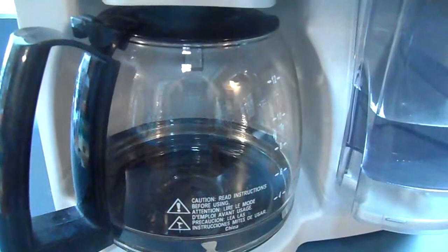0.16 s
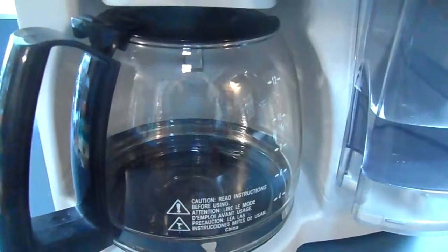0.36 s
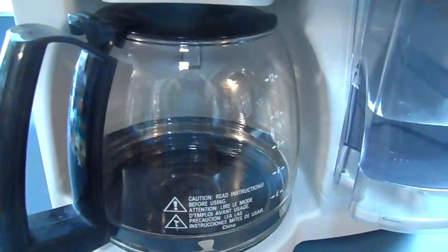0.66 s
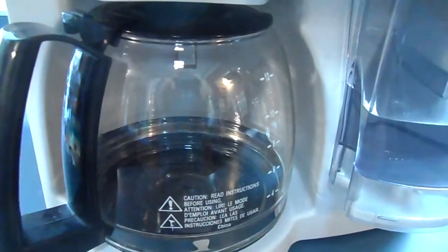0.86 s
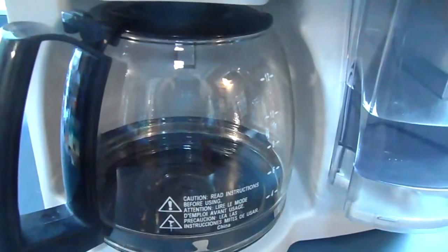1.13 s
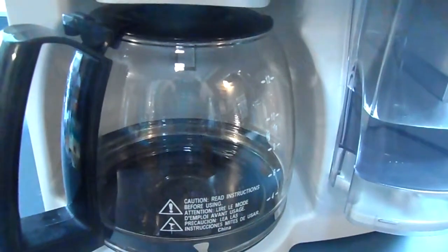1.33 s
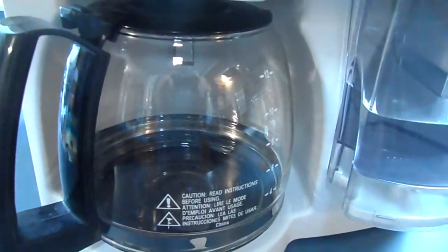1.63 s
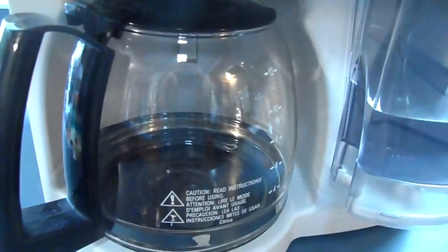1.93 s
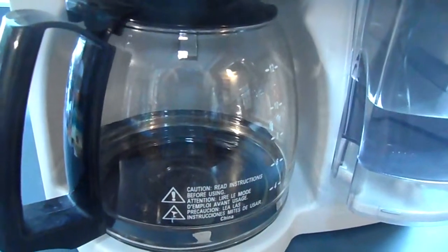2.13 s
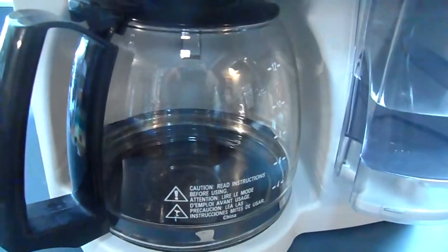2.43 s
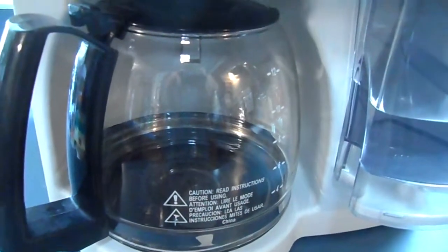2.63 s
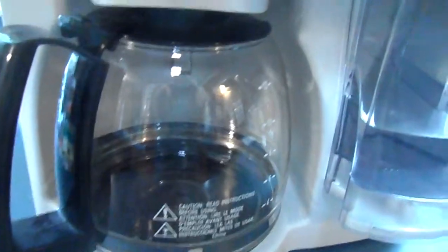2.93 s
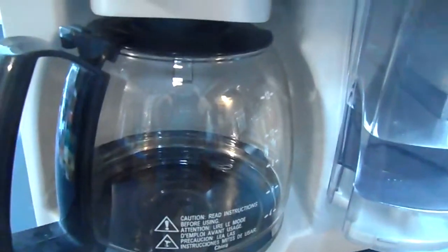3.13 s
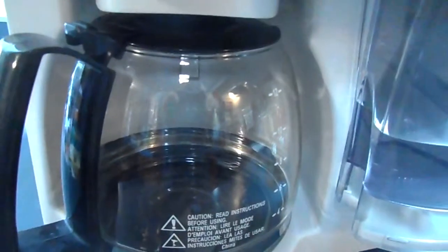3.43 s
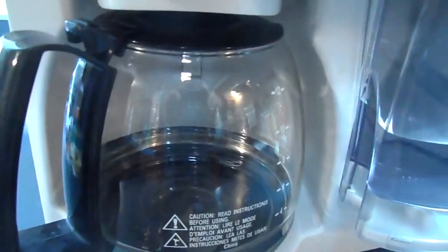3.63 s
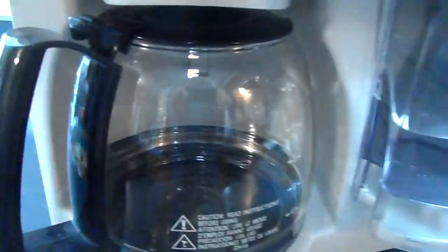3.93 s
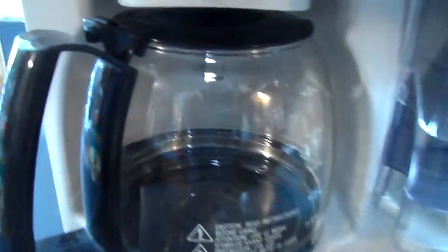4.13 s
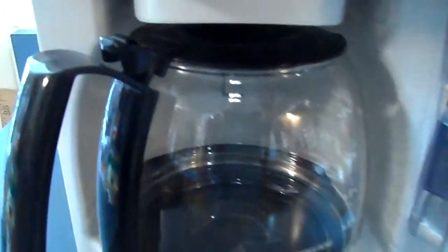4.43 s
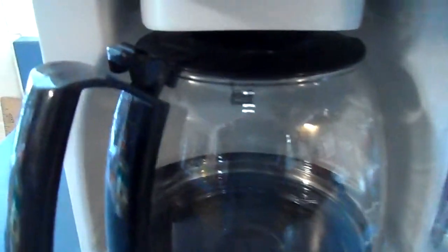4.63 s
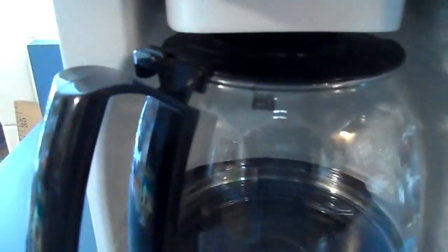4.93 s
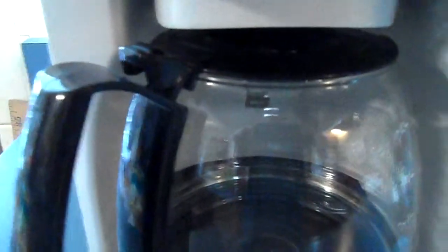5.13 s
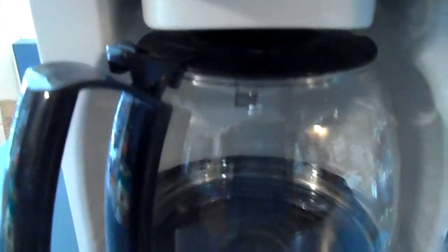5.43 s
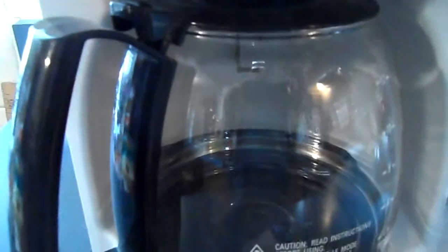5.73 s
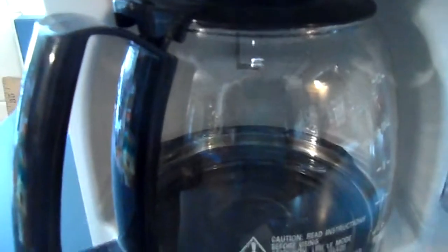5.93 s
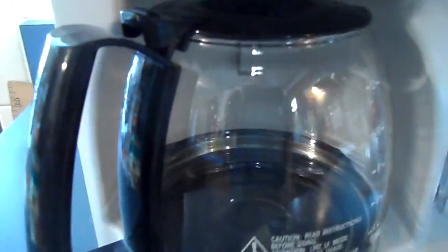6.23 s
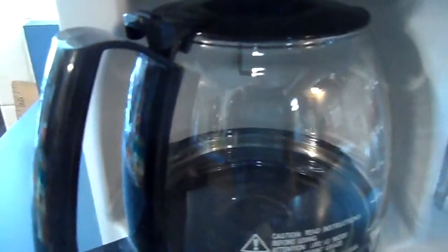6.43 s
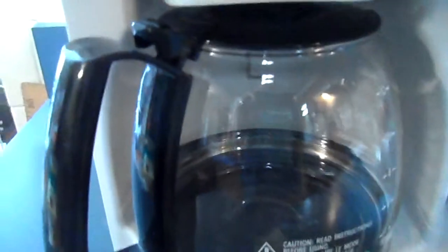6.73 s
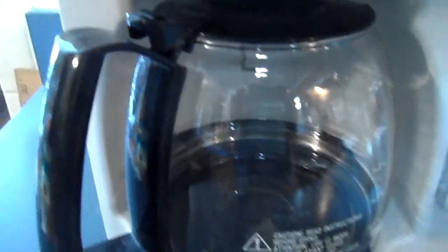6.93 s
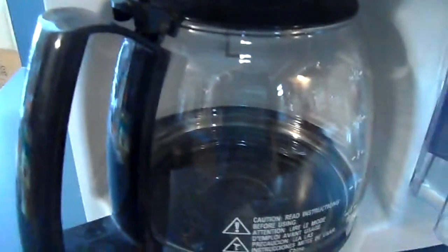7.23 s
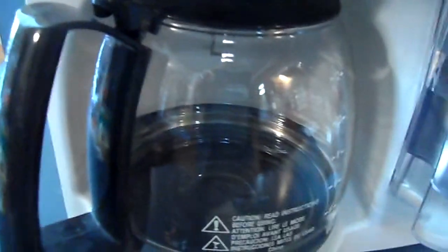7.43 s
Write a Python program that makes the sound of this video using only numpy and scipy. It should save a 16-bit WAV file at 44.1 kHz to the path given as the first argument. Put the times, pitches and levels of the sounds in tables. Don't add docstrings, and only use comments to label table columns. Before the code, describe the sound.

Close coffee machine heating water: quiet seething and scattered spits, then brief rumbling surges of boiling knocks around three, five and six seconds.

```python
import sys
import numpy as np
from scipy import signal
from scipy.fft import rfft, irfft
from scipy.io import wavfile
from scipy.ndimage import uniform_filter1d, map_coordinates

SR = 44100
rng = np.random.default_rng(int(sys.argv[2]) if len(sys.argv) > 2 else 0)


def attenuation_scalar(level_db):
    decades = np.asarray(level_db, float) / 20
    return 10 ** decades


def log_audio(samples):
    frames = np.atleast_2d(samples).T
    limited = np.clip(frames, -1, 1)
    pcm = np.round(limited * 32767).astype(np.int16)
    wavfile.write(sys.argv[1], SR, pcm)


N = 334278
TOP_HZ = 14250

# f/Hz, width/Hz, level/dB
TUBE_MODES = [(238.2, 14, -1.5), (344.7, 18.5, -1), (427.3, 30, -1), (492, 59, -2), (589, 63, -3.5),
              (938.6, 50, -3)]
# f/Hz, width/Hz, level/dB
SHELL_MODES = [(1878, 470, 17.5), (2320, 540, 9), (3000, 550, 12.5), (3690, 400, -5), (4330, 70, 1)]


def level(x, db):
    return x * attenuation_scalar(db) / np.sqrt(np.mean(x ** 2))


def ring(x, hz, width):
    centre, q = min(hz, .4 * SR), max(hz / width, .5)
    return signal.lfilter(*signal.iirpeak(centre, q, SR), x)


def steep(x, hz, width):
    return ring(ring(x, hz, width), hz, 2 * width)


def resonate(x, modes, widen=1):
    return sum(attenuation_scalar(db) * steep(x, hz, widen * width) for hz, width, db in modes)


def coloured(points):
    hz, db = np.transpose(points)
    f = np.fft.rfftfreq(N, 1 / SR) + 1
    shape = attenuation_scalar(np.interp(np.log(f), np.log(hz), db)) * (f < TOP_HZ)
    return level(irfft(rfft(rng.standard_normal(N)) * shape, N), 0)


def walk(rate):
    k = int(SR / rate)
    steps = np.repeat(rng.standard_normal(N // k + 1), k)
    return 2.47 * uniform_filter1d(uniform_filter1d(steps, k), k)[:N]


def burst(noise, ms, rise):
    u = np.arange(len(noise)) / SR / (max(ms, .3) / 1000)
    return noise * (1 - np.exp(-u / rise)) * np.exp(-u)


def add(out, s, sound, db):
    i = int(s * SR)
    piece = sound[:N - i]
    out[i:i + len(piece)] += piece * attenuation_scalar(db) / np.max(np.abs(sound))


def lasting(table, ms):
    return [(*row, ms) for row in table]


def pan(x, db):
    return x * attenuation_scalar(np.array([[db / 2], [-db / 2]]))


def pockets():
    # t/s, peak level/dB, f/Hz
    lone = [(.016, -40, 1110), (.158, -43.5, 410), (.459, -41, 1060), (.495, -40, 1020), (.672, -44, 666),
            (.889, -35.5, 667), (.958, -43, 770), (1.142, -41, 630), (1.188, -45, 615), (1.277, -36, 1005),
            (1.29, -39, 630), (1.361, -42, 625), (1.44, -42, 620), (1.641, -38, 623), (2.251, -45.5, 940),
            (2.457, -37.5, 990), (2.556, -40.5, 1040), (2.86, -46, 920), (2.985, -40, 1080),
            (3.881, -43, 1010), (3.94, -36.5, 515), (4.035, -41.5, 606), (4.075, -41, 615),
            (4.253, -45, 417), (5.357, -45, 920), (5.421, -36, 1020), (6.871, -43.5, 584),
            (6.907, -37.5, 930), (6.945, -40, 590), (7.073, -42, 585)]
    # t/s, peak level/dB, f/Hz
    trains = [(3.144, -43.5, 640), (3.173, -39, 614), (3.187, -28.5, 596), (3.247, -32, 604),
              (3.289, -28, 533), (3.346, -49, 590), (3.38, -35, 640), (3.407, -31, 490),
              (3.444, -35.5, 643), (3.486, -39, 930), (3.304, -33, 557), (4.968, -30.5, 700),
              (4.99, -33, 664), (5.025, -41, 620), (5.494, -38.5, 990), (5.895, -48, 774), (5.91, -37, 414),
              (6.049, -28.5, 560), (6.102, -34, 560), (6.126, -43, 610), (6.151, -32, 566),
              (6.169, -30.5, 440), (6.213, -26.5, 530), (6.252, -39, 560), (6.295, -39, 940),
              (6.632, -46, 397), (6.698, -34, 590)]
    lead_s, snap_db = 0.001494, 1
    out = np.zeros(N)
    for s, db, hz, ms in lasting(lone, 10.7) + lasting(trains, 7.3):
        puff = burst(rng.standard_normal(8192), ms, rise=0.088)
        puff[20:30] -= attenuation_scalar(snap_db)
        puff = steep(puff, 730, 1540)
        tube = resonate(puff, TUBE_MODES, widen=1.41)
        own_pitch = attenuation_scalar(0.5) * steep(puff, hz, 0.21 * hz)
        add(out, s - lead_s, tube + own_pitch, db + 0.063)
    return out


def thumps():
    # t/s, peak level/dB, length/ms
    slugs = [(3.134, -46, 7.6), (3.195, -28, 10.5), (3.219, -31, 2.7), (3.248, -39, 11), (3.298, -31.5, 5),
             (3.409, -29.5, 5), (3.469, -42.5, 7), (4.971, -43.5, 11), (5.504, -48, 7.6), (5.962, -41, 10),
             (6.006, -40, 7), (6.036, -29, 4.4), (6.067, -26, 2.5), (6.11, -32, 9.2), (6.132, -29.5, 12),
             (6.159, -30.5, 9.7), (6.194, -33.5, 5.3), (6.24, -36.5, 5), (6.633, -38.5, 7.8),
             (6.7, -32.5, 6.9)]
    out, t = np.zeros(N), np.arange(8192) / SR
    for s, db, ms in slugs:
        hz = 160.6 * (1 + 0.029 * rng.standard_normal())
        blow = burst(np.sin(2 * np.pi * hz * t), ms, rise=0.071)
        add(out, s, ring(blow, hz, width=41), db + 1.0)
    return out


def surges():
    # t/s at full strength, level/dB, hold/s
    rolling = [
        (3.19, -44.5, 0.27),
        (4.977, -38, 0.021),
        (5.5, -44.5, .02),
        (5.925, -49.5, 0.081),
        (6.034, -39.5, 0.19),
        (6.486, -51.5, 0.022),
        (6.696, -39.5, 0.016),
    ]
    rise_db_s, fall_db_s = 700, 157
    t, strength = np.arange(N) / SR, np.zeros(N)
    for s, db, hold in rolling:
        before, after = np.maximum(s - t, 0), np.maximum(t - s - hold, 0)
        strength += attenuation_scalar(db - rise_db_s * before - fall_db_s * after)
    return strength


def boil():
    lumpy = rng.standard_normal(N) * attenuation_scalar(1.2 * walk(70))
    drive = steep(lumpy, 380, 700)
    tube = resonate(drive, TUBE_MODES, widen=1.7) + attenuation_scalar(-1) * steep(drive, 267, 127)
    return level(tube, -4.0) * surges()


def spits():
    # t/s, peak level/dB, f/Hz
    dry_ticks = [(.8863, -39.5, 1850), (1.0417, -37.5, 1950), (1.072, -41, 2200), (1.214, -42, 1850),
                 (1.288, -28.5, 2610), (1.3564, -38, 2270), (1.639, -31.5, 1780), (2.609, -44, 1520),
                 (2.8602, -35.5, 2530), (2.8951, -44, 3700), (3.0313, -38.5, 3900), (3.3481, -44, 3300),
                 (3.3785, -43.5, 1370), (3.4588, -41.5, 3470), (3.4868, -37.5, 1870), (3.955, -43, 4150),
                 (3.9615, -40, 4000), (4.2522, -37.5, 2930), (4.9741, -37, 1460), (5.1896, -39, 3400),
                 (5.5388, -46.5, 3000), (5.7024, -44, 2860), (6.2098, -32.5, 1790), (6.2607, -39, 2280),
                 (6.5216, -44, 3500), (6.543, -40, 1990), (6.6448, -45, 2000), (7.0853, -41.5, 2800),
                 (3.0697, -50, 3920), (4.342, -53, 1850)]
    # t/s, peak level/dB, f/Hz
    wet_spits = [(.0144, -45.5, 3530), (.4908, -50, 1730), (.9553, -39.5, 3250), (.9824, -46, 3320),
                 (1.0181, -47, 1410), (1.0939, -48, 1400), (1.1233, -47.5, 3480), (1.1518, -40.5, 3480),
                 (1.271, -39, 3340), (1.37, -38, 2460), (2.2493, -43, 4460), (2.4518, -43.5, 1490),
                 (2.9824, -42.5, 3560), (3.173, -44, 2040), (3.6075, -48.5, 1800), (3.935, -34, 3800),
                 (4.0347, -44, 1660), (4.0731, -44.5, 1440), (4.3725, -41.5, 1810), (5.4909, -46, 1400),
                 (5.913, -46, 1510), (5.9703, -44.5, 4700), (6.2926, -42.5, 3200), (6.8698, -37.5, 3300),
                 (6.9795, -44, 1790), (7.0499, -49, 1780), (7.1077, -42.5, 1340), (7.1297, -47.5, 2840),
                 (7.5612, -43.5, 1420), (1.4406, -47.5, 2500)]
    out = np.zeros(N)
    for s, db, hz, ms in lasting(dry_ticks, 2.52) + lasting(wet_spits, 5.4):
        puff = burst(rng.standard_normal(4096), ms, rise=0.39)
        pitch = attenuation_scalar(3) * steep(puff, hz, 0.056 * hz)
        grit = attenuation_scalar(-3.5) * steep(puff, hz, 0.38 * hz)
        shell = attenuation_scalar(-17.5) * resonate(puff, SHELL_MODES)
        add(out, s, pitch + grit + shell, db - .5)
    return out


def fizz():
    # t/s, peak level/dB, f/Hz
    bubbles = [(0.014, -48, 5900), (0.424, -47.5, 5400), (.9832, -46, 6900), (.9946, -44, 7770),
               (1.033, -39.5, 6670), (1.072, -47.5, 5550), (1.122, -47.5, 5620), (1.28, -52, 6000),
               (1.3369, -48, 10500), (1.358, -45, 5700), (2.248, -48, 5830), (2.4528, -45, 5940),
               (2.8936, -41.5, 8000), (2.982, -50, 7530), (3.4204, -48, 7750), (3.4578, -45, 5540),
               (5.1901, -45.5, 7350), (5.3622, -43, 5260), (5.4167, -44.5, 6800), (5.7022, -43.5, 5470),
               (6.2946, -46, 5300), (6.6422, -44.5, 5650), (6.8693, -40.5, 5030), (7.0843, -40, 5750),
               (7.5622, -50, 6020)]
    # t/s, peak level/dB, f/Hz, length/ms
    breaths = [
        (0.415, -51, 2600, 16),
        (1.384, -48, 6500, 4),
        (4.735, -49, 7900, 22),
        (4.886, -55, 3300, 29),
        (5.624, -53.5, 6000, 20),
        (6.6, -54, 7000, 25),
        (6.52, -51, 5000, 10),
    ]
    out = np.zeros(N)
    for s, db, hz, ms in lasting(bubbles, 3.4) + breaths:
        puff = burst(rng.standard_normal(4096), ms, rise=0.19)
        spray = attenuation_scalar(-11.5) * steep(puff, 11000, 6300)
        add(out, s, steep(puff, hz, 0.52 * hz) + spray, db + 0.064)
    return out


def drop():
    # f/Hz, peak level/dB, swell/ms
    tones = [(4030, -18, 0.55), (3200, -29.5, 0.81), (5750, -45, .3), (8130, -28.5, 0.22),
             (12400, -42, 0.13), (920, -31.5, 0.44)]
    lead = 220
    out, ms = np.zeros(N), np.arange(-lead, 400) / SR * 1000
    for hz, db, swell_ms in tones:
        side_ms = swell_ms * np.where(ms > 0, 1.5, 1)
        shape = np.exp(-np.abs(ms / side_ms) ** 1.6)
        add(out, 3.942 - lead / SR, -shape * np.cos(2 * np.pi * hz * ms / 1000), db)
    return out


def knock():
    # f/Hz, width/Hz, level/dB
    lid_modes = [(470, 350, 13), (1070, 200, 11), (1850, 640, 9.5), (2600, 530, 9.5), (3260, 480, -4),
                 (4340, 420, -11), (6800, 1500, -11), (13000, 10840, -24)]
    knock_s, peak_db, push_ms, rebound_ms = 2.7549, -16.5, .12, 1.25
    ms = np.arange(2048) / SR * 1000 - 1
    pull = -np.exp(-.5 * (ms / push_ms) ** 2)
    rebound = .55 * np.exp(-.5 * ((ms - rebound_ms) / .45) ** 2)
    rattle = burst(rng.standard_normal(2048), 0.78, rise=0.4)
    out = np.zeros(N)
    add(out, knock_s - 1 / 1000, pull + rebound, peak_db)
    add(out, knock_s, resonate(rattle, lid_modes), peak_db - 6.0)
    return out


def simmer_level():
    # t/s, level/dB
    strength = [(0, -66), (.4, -62), (.85, -55.5), (1.15, -53), (1.45, -58.5), (1.8, -66.5), (2.5, -62.5),
                (3.0, -55), (3.7, -63.5), (4.1, -58.5), (4.6, -68), (4.9, -58.5), (5.3, -64), (5.7, -59.5),
                (6.3, -55), (6.9, -55), (7.58, -61.5)]
    s, db = np.transpose(strength)
    return np.interp(np.arange(N) / SR, s, db)


def simmer():
    out = np.zeros(N)
    fall = np.exp(-1 / (.004 * SR))
    for modes, db in ((TUBE_MODES, 0), (SHELL_MODES, -10)):
        sizes = attenuation_scalar(np.minimum(4 * rng.exponential(size=N), 11))
        grains = (rng.random(N) < 110 / SR) * sizes
        envelope = signal.lfilter([1], np.convolve([1, -fall], [1, -fall ** 3]), grains)
        smear = envelope * rng.standard_normal(N)
        out += level(resonate(smear, modes, widen=2.95), db)
    return level(out, 0)


def seethe(simmer_db):
    # f/Hz, width/Hz
    bands = [
        (1130, 64),
        (3760, 184),
    ]
    out, t = np.zeros(N), np.arange(N) / SR
    swing_db = 0.21 * (simmer_db - np.mean(simmer_db))
    for (hz, width), start_db, drift_db_s in zip(bands, (-63, -71.5), (0, .5)):
        db = start_db + drift_db_s * t + swing_db + 2.2 * walk(16)
        out += attenuation_scalar(db) * level(steep(rng.standard_normal(N), hz, width), -4.0)
    return out


def kitchen_air():
    # f/Hz, level/dB per Hz
    air_points = [(100, -13), (206, -16), (337, -19.5), (551, -34), (745, -25.5), (1000, -30.5),
                  (1400, -35.5), (2100, -32), (2930, -41.5), (4300, -44), (7000, -52), (14000, -67)]
    spectrum, swell = rfft(level(coloured(air_points), -55)), walk(1.79)
    octave = np.log2(np.fft.rfftfreq(N, 1 / SR) / 100 + 1e-9)
    out = np.zeros(N)
    for k in range(8):
        band = irfft(spectrum * np.clip(1 - np.abs(octave - k), 0, 1), N)
        out += band * attenuation_scalar(.5 * swell + .7 * walk(25))
    return out


def room_rumble():
    # f/Hz, level/dB per Hz
    rumble_points = [(8.8, -70), (15, 11), (27, 1), (59, -3.5), (86, -3.5), (119, -14), (130, -12),
                     (170, -16), (290, -120)]
    return attenuation_scalar(-47 - 0.2 * np.arange(N) / SR) * coloured(rumble_points)


def far_motor():
    hum = level(steep(rng.standard_normal(N), 90, 16), 0)
    return attenuation_scalar(-53 - 8.5 * np.arange(N) / SR) * hum


def background():
    simmer_db = simmer_level()
    heater = attenuation_scalar(simmer_db) * simmer() + seethe(simmer_db)
    return heater + kitchen_air() + room_rumble() + far_motor()


def mic_hiss():
    # f/Hz, level/dB per Hz
    hiss_points = [(18, -32), (30, 3.5), (96, -7.5), (419, -12.5), (453, -13), (1120, -19), (13100, -26.5),
                   (14500, -27.5)]
    return attenuation_scalar(-60.5) * np.array([coloured(hiss_points), coloured(hiss_points)])


def scene():
    top = signal.butter(8, .93 * TOP_HZ, fs=SR, output="sos")
    bright = signal.sosfilt(top, spits() + fizz())
    dull = signal.sosfilt(top, pockets() + thumps() + boil())
    lid = signal.sosfilt(top, knock())
    tail = rng.standard_normal((2, 6000)) * np.exp(-np.arange(6000) / SR / 0.029)
    tiles = signal.fftconvolve((bright + dull + lid)[None], tail, axes=1)[:, :N]
    late = map_coordinates(bright, [np.arange(N) - 2e-5 * SR], mode="nearest")
    near = pan(np.array([bright, late]), -0.8) + pan(dull, -1.5) + pan(lid, 2.5) + pan(drop(), -0.71)
    return near + attenuation_scalar(-47.5) * tiles + pan(background(), -1)


def low_pass(x):
    return signal.sosfilt(signal.butter(12, 15520, fs=SR, output="sos"), x)


def record(dry):
    return low_pass(dry + mic_hiss())


dry = scene()
out = record(dry)
log_audio(out)
```